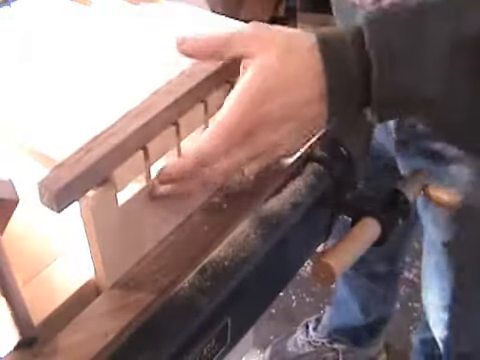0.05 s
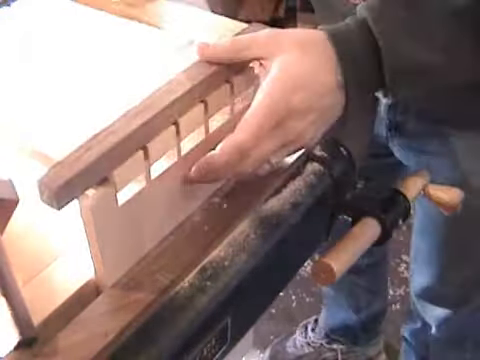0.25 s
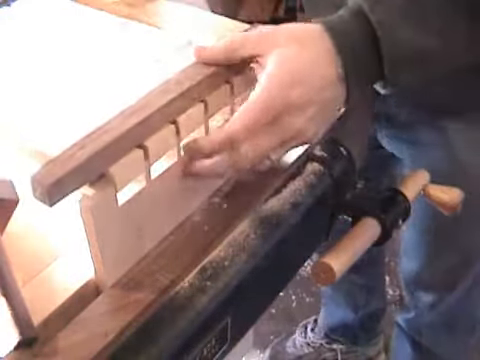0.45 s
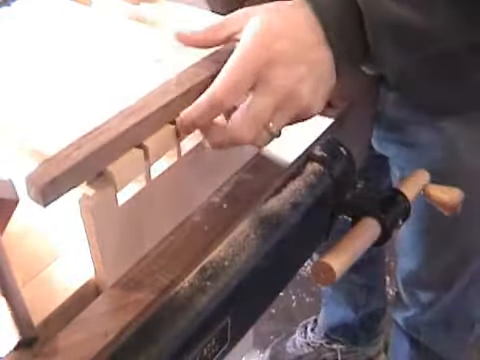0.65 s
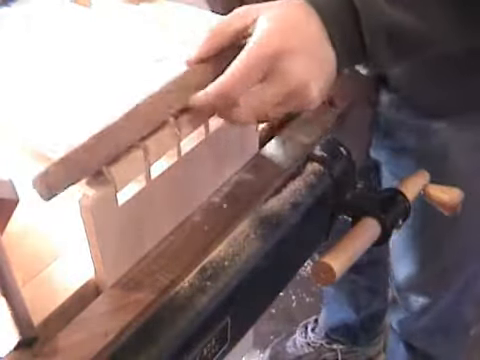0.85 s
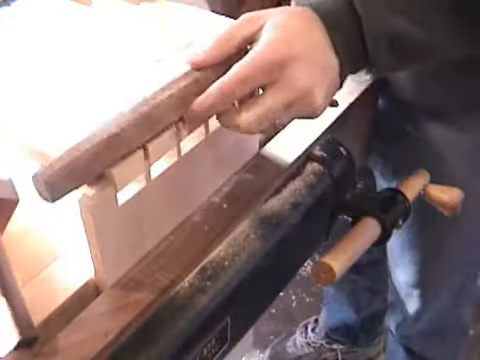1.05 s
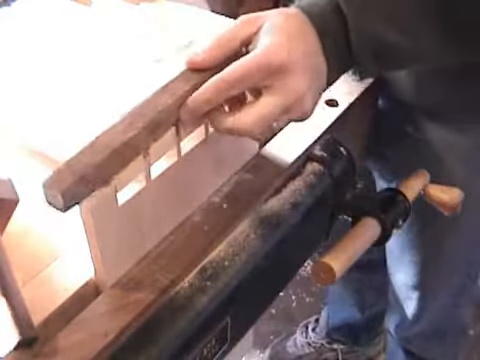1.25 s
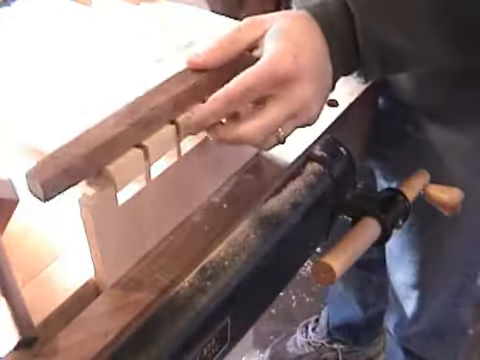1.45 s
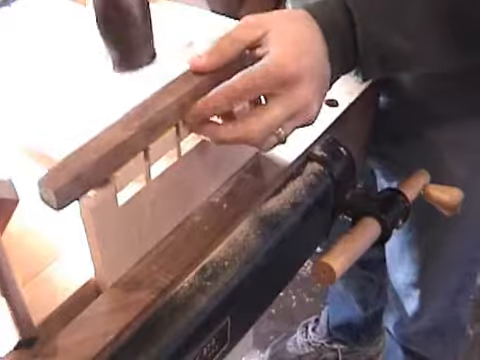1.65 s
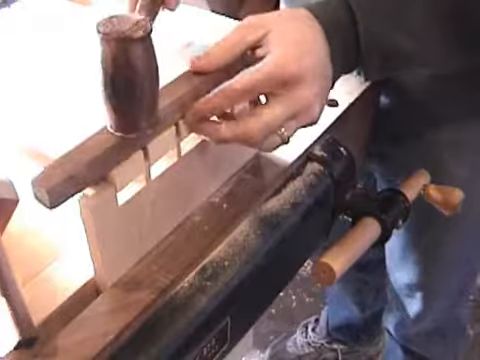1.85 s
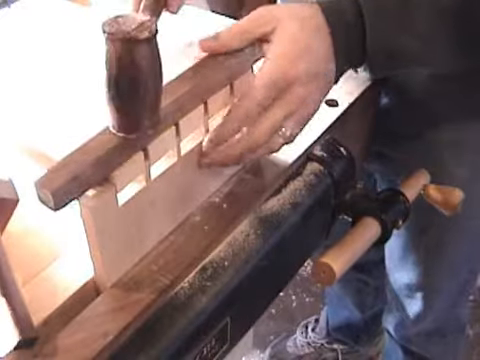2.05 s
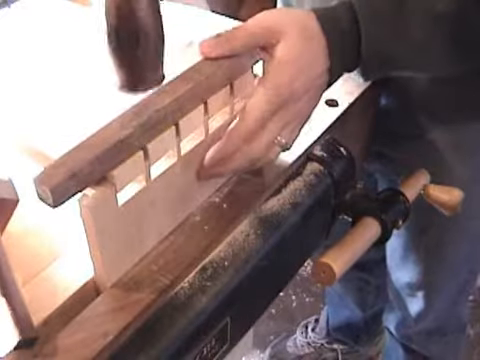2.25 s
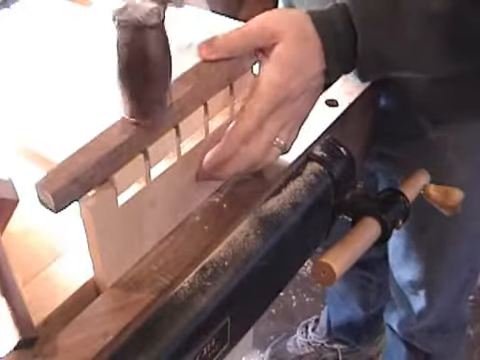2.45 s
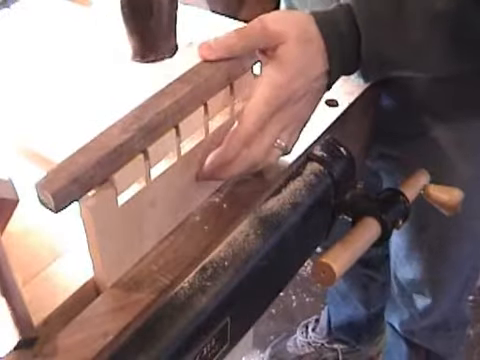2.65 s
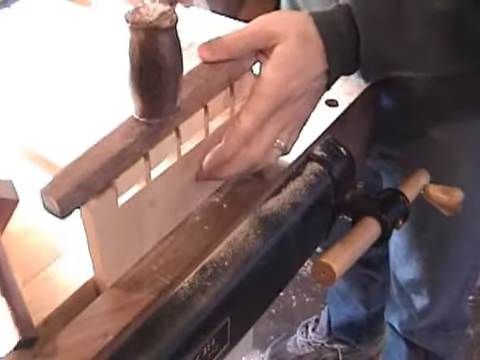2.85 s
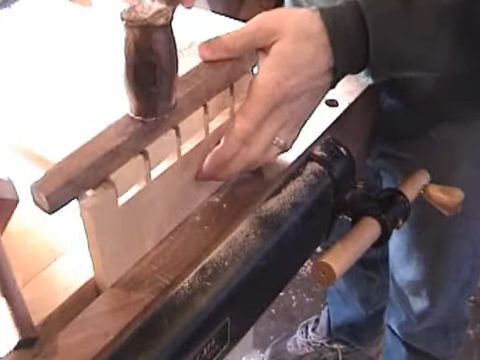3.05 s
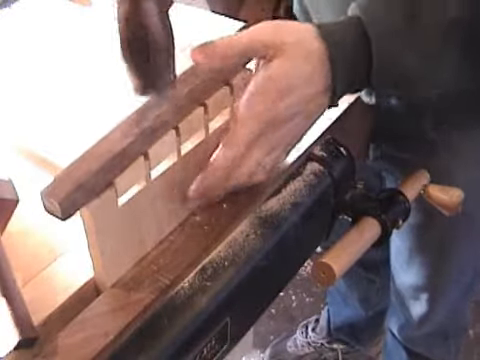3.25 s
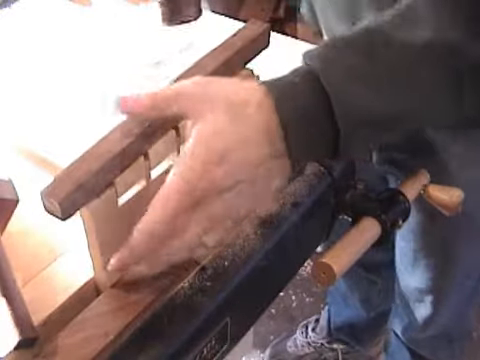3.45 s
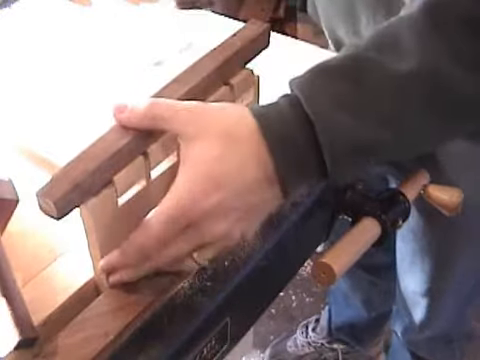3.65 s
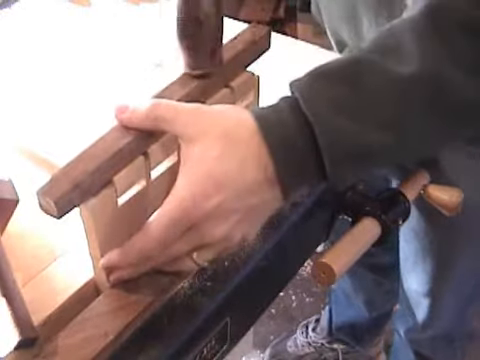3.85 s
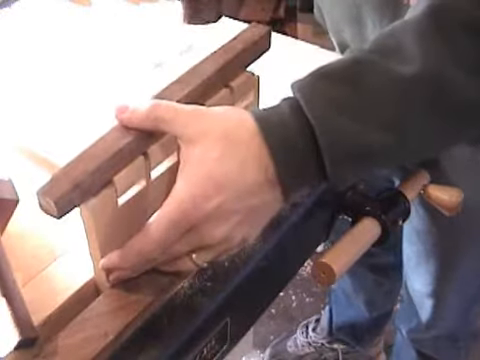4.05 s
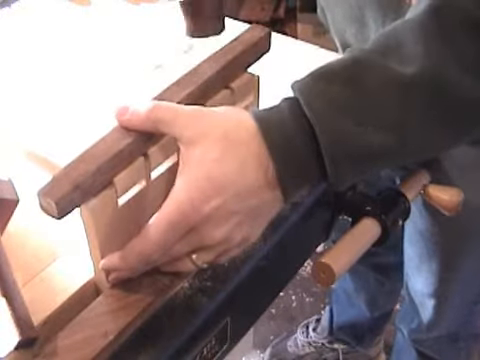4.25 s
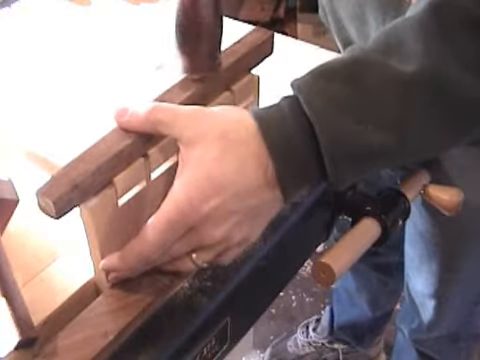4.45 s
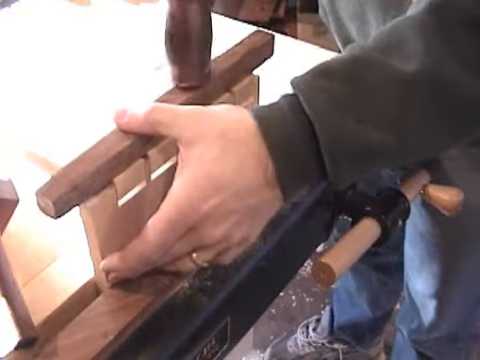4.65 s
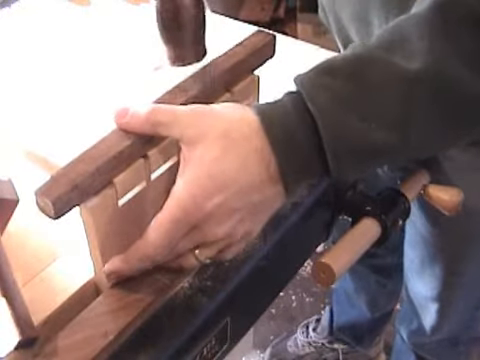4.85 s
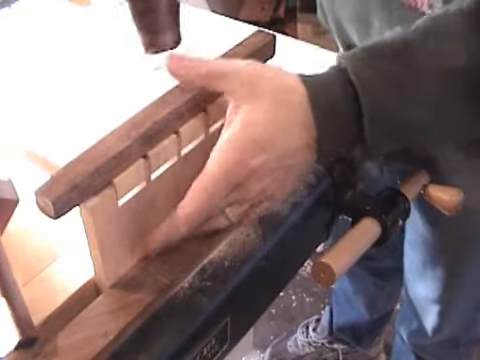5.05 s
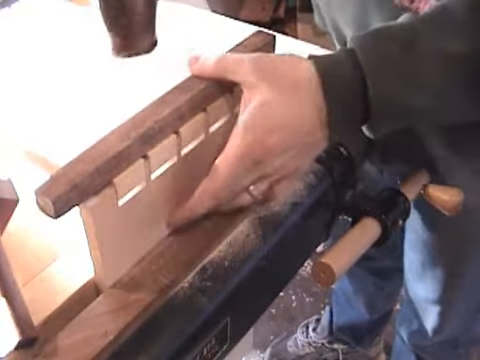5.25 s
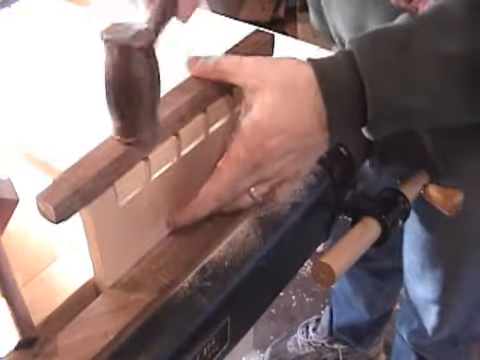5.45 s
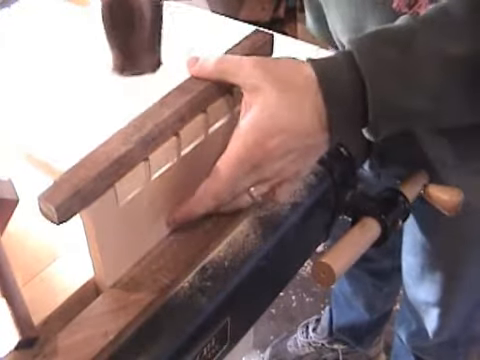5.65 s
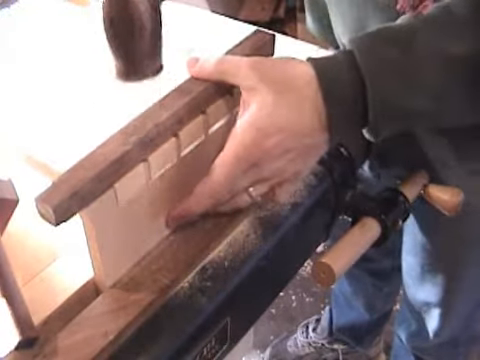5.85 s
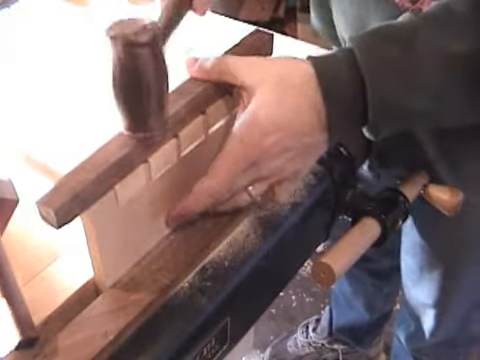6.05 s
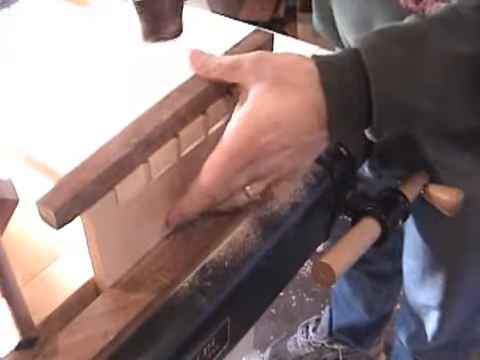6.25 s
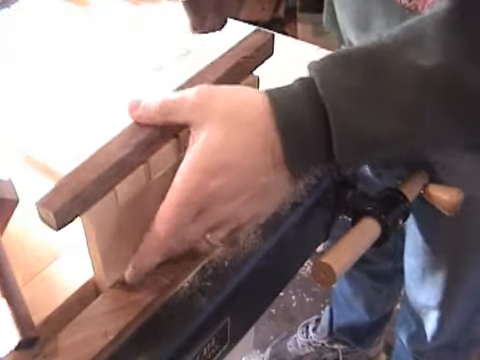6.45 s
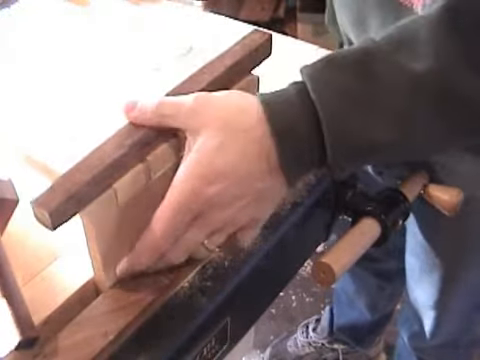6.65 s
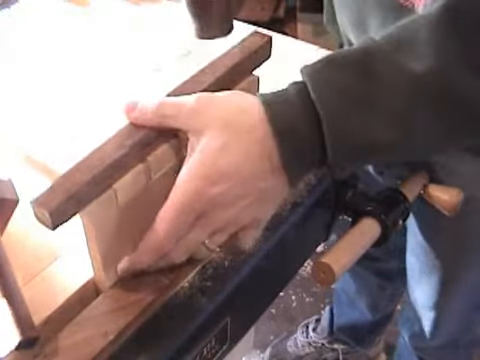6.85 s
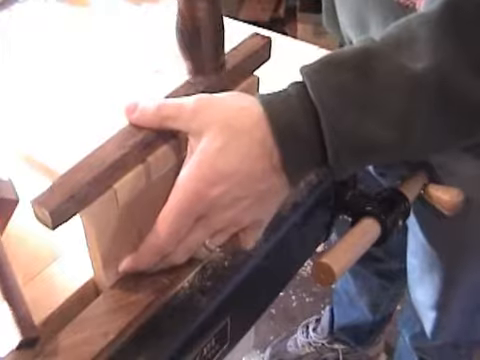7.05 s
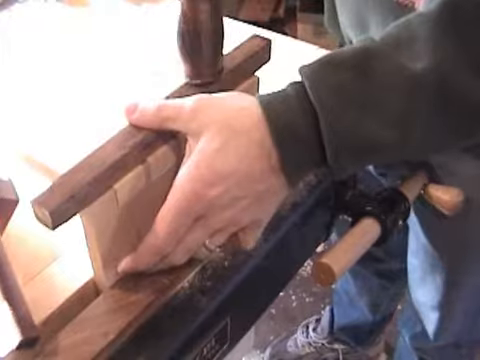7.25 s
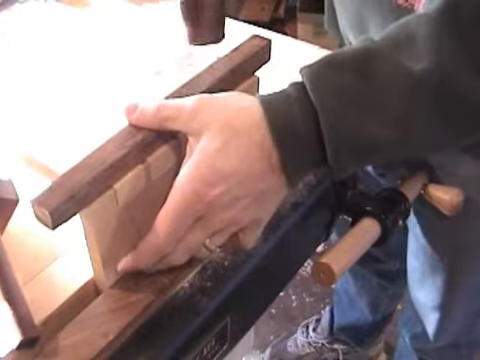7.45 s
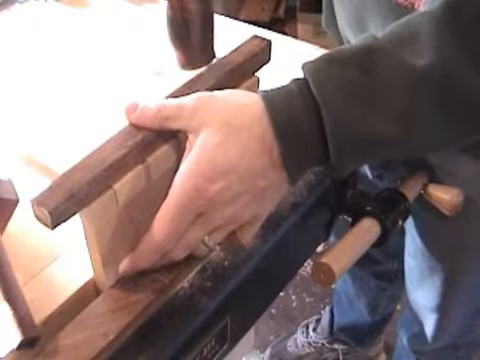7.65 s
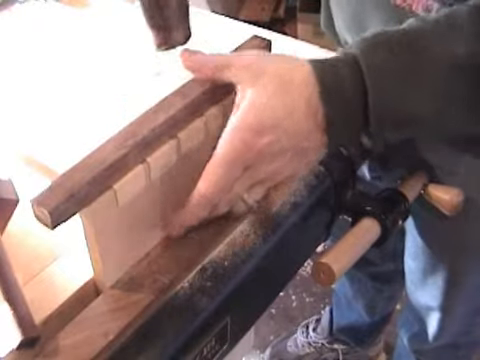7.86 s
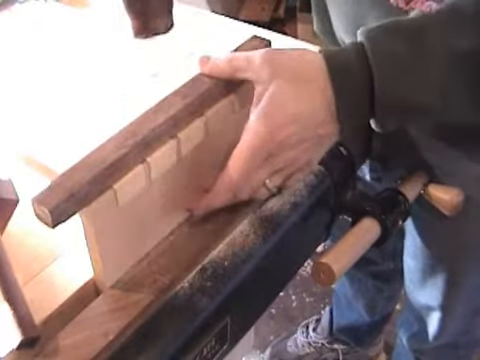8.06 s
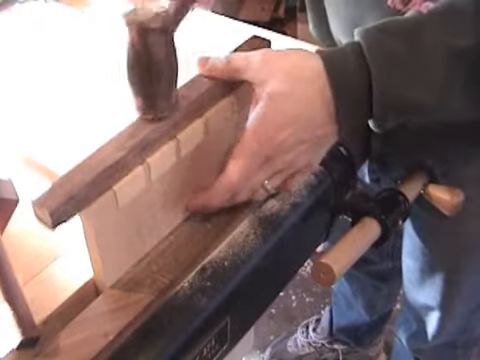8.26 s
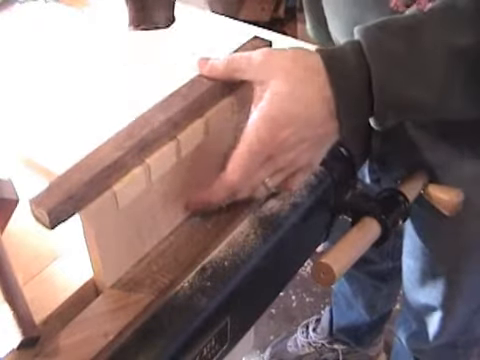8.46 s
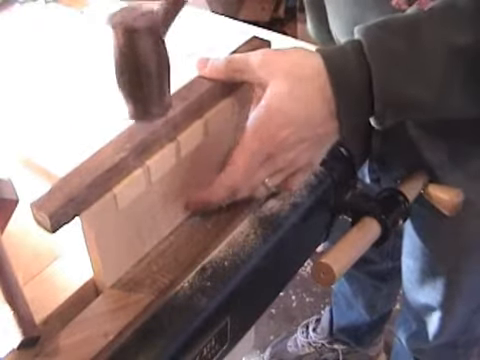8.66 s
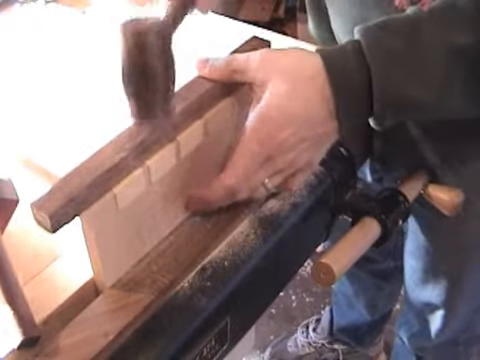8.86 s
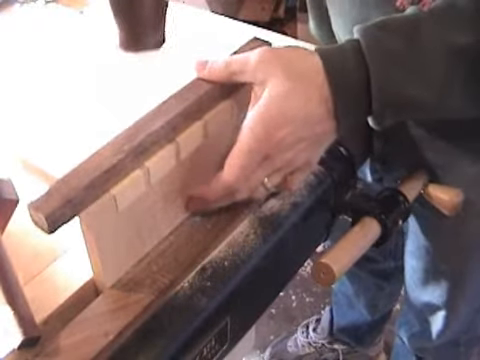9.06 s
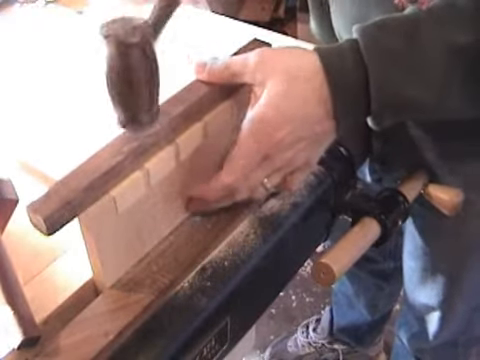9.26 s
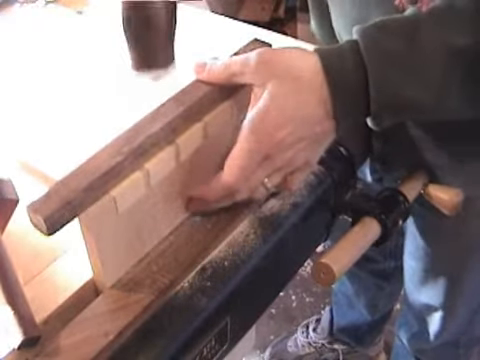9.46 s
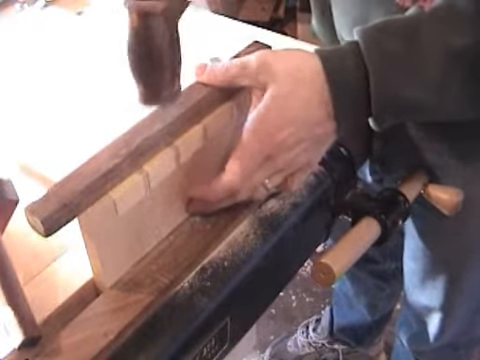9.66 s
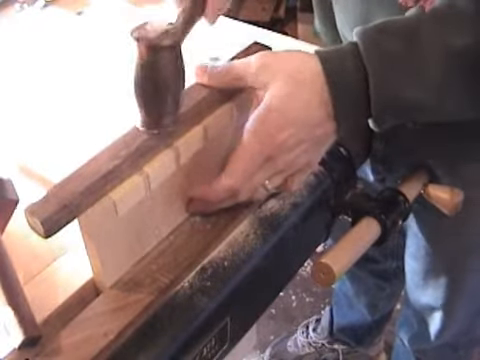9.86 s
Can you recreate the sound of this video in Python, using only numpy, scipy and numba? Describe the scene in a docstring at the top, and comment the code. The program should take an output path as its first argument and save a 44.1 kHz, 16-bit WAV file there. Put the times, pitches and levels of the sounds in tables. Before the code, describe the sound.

A wooden mallet raps a board joint in short runs of sharp, ringing knocks, echoing in a hard workshop over a low machinery rush.

```python
"""A wooden mallet knocks a dovetailed board home in a vice, heard close up in a hard-walled workshop.
Each blow is a chirped crack of filtered impulse plus decaying sines, the ringing modes of the boards.
The room returns it as a low flutter, a slap from the far wall and a dense tail of decaying noise.
Shaped noise makes the rush of distant machinery and an early hiss of fingers sliding on the wood.
A fast limiter and a slower gain control squeeze the loud blows."""
import sys
import numpy as np
from scipy import signal
from scipy.fft import rfft, irfft
from scipy.io import wavfile
from scipy.ndimage import uniform_filter1d
from numba import njit

SR = 44100
rng = np.random.default_rng(int(sys.argv[2]) if len(sys.argv) > 2 else 0)


def to_wav(s):
    """Save 16-bit WAV."""
    ch = np.atleast_2d(s).T  # columns
    pcm = np.round(np.clip(ch, -1, 1) * 32767)  # PCM
    wavfile.write(sys.argv[1], SR, pcm.astype(np.int16))


N = 436590


def undb(db):
    """Decibels to gain."""
    return 10 ** (np.asarray(db) / 20)


def colour(x, table):
    """Shape the spectrum by (Hz, dB) points, joined by straight lines over log frequency."""
    hz, db = np.transpose(table)
    f = np.fft.rfftfreq(x.shape[-1], 1 / SR) + 1
    gain = undb(np.interp(np.log(f), np.log(hz), db))
    return irfft(rfft(x) * gain, x.shape[-1])


def level(x, db):
    """Scale to an rms level."""
    return x * undb(db) / np.sqrt(np.mean(x ** 2))


def band(x, lo_hz, hi_hz):
    """Causal band-pass."""
    return signal.sosfilt(signal.butter(2, [lo_hz, hi_hz], "band", fs=SR, output="sos"), x)


def low_pass(x, hz):
    """Causal gentle low-pass."""
    return signal.sosfilt(signal.butter(2, hz, fs=SR, output="sos"), x)


def fade(t, t60):
    """Exponential decay, 60 dB down at t60 seconds."""
    return np.exp(-np.log(1000) * t / t60)


def walk(rate):
    """Random levels drawn rate times a second, then smoothed twice over one hold; spread below 1."""
    hold = int(SR / rate)
    steps = np.repeat(rng.standard_normal(N // hold + 1), hold)
    return uniform_filter1d(uniform_filter1d(steps, hold), hold)[:N]


@njit
def follow(x, attack, release):
    """Envelope follower with separate per-sample rates for rising and falling."""
    out, e = np.empty(len(x)), 0.
    for i in range(len(x)):
        e += (x[i] - e) * (attack if x[i] > e else release)
        out[i] = e
    return out


def shop():
    """Rush of far machines and air: shaped stereo noise whose lows flicker and whose rumble drifts."""
    # Spectrum of the rush. Each row: frequency in Hz, relative level in dB.
    rush_spectrum = [(12, -54), (20, -20.5), (108, -13), (169, -1.5), (215, -11.5), (281, -4), (313, -13.5),
                     (367, -8), (506, -7), (818, -9), (4390, -30), (9530, -46), (11800, -54), (15300, -95),
                     (22000, -120)]
    # Width of the rush. Each row: frequency in Hz, side minus mid in dB.
    rush_width = [(30, -9), (60, -10), (150, -11), (300, -10.5), (1500, -7), (3000, -5.5), (6000, -1),
                  (10000, 3)]
    # Slow drift of the deep rumble. Each row: time in seconds, change in dB.
    rumble_drift = [(0, -1.5), (5.5, -7.5), (7.5, 1), (9.9, -5)]
    mid, side = colour(rng.standard_normal((2, N)), rush_spectrum)
    rush = mid + colour(side, rush_width) * np.array([[1], [-1]])
    flicker = undb(3 * walk(9))
    drift = undb(np.interp(np.arange(N) / SR, *np.transpose(rumble_drift)))
    moving_lows = (flicker - 1) * low_pass(rush, 900)
    moving_rumble = (drift - 1) * low_pass(rush, 140)
    return level(rush + moving_lows + moving_rumble, -29.5)


def fingers():
    """Fingers sliding on the board: grainy hiss, lifted near 6 kHz, that swells, then stops short."""
    start_s, peak_s, peak_db = .16, .4, -34
    swell_db_per_s, fall_db_per_s = 70, 351
    t = np.arange(N) / SR
    swell_db = peak_db + np.minimum(swell_db_per_s * (t - peak_s), fall_db_per_s * (peak_s - t))
    grainy_noise = rng.standard_normal((2, N)) * undb(1.34 * walk(116))
    hiss = level(band(grainy_noise, 2500, 7300), 0) + level(band(grainy_noise, 5500, 6300), -15)
    return hiss * undb(swell_db) * (t > start_s)


def crack(length, tone):
    """The contact click, smeared into a falling chirp since high bending waves reach the air first."""
    # Spectrum of the click. Each row: frequency in Hz, relative level in dB.
    click_spectrum = [(200, -60), (800, -3), (1600, 4), (3000, 5), (4500, -2), (6500, -15), (9000, -23),
                      (12000, -40)]
    f = np.fft.rfftfreq(length, 1 / SR)
    spread_s, knee_hz = .005, 3400
    # lateness grows toward the lows and is held below 1200 Hz
    lateness = np.clip(np.sqrt(knee_hz / np.maximum(f, 1200)) - .75, 0, None)
    delay_s = spread_s * lateness + .0002
    # summing delay over frequency gives the phase of the chirp
    chirp = irfft(np.exp(-2j * np.pi * np.cumsum(delay_s) * f[1]), length)
    return colour(colour(chirp, click_spectrum), tone)


def knock(main_hz, bright_hz, thud_db, low_db, middle_db, upper_db, top_db):
    """One blow: a short crack and the decaying modes of the boards, some varied from blow to blow."""
    # Fixed modes of the boards. Each row: frequency in Hz, t60 in seconds, relative level in dB,
    # family whose strength each blow sets.
    board_modes = [(129.2, 0.13, -26, "thud"), (217.5, 0.095, -20, "thud"), (279.6, 0.067, -12.5, "thud"),
                   (340.8, 0.07, -12, "thud"), (517.8, 0.069, -7.5, "low"), (902, 0.019, -4.5, "middle"),
                   (1107, 0.015, -3.5, "middle"), (1325, 0.015, -4, "middle")]
    t = np.arange(8192) / SR
    family_db = dict(thud=thud_db, low=low_db, middle=middle_db)
    modes = [(f, t60, db + family_db[family]) for f, t60, db, family in board_modes]
    # these two rings move in pitch with the spot struck and the closing joint
    modes += [(main_hz, .028, 0), (bright_hz, .012, -4.5 + upper_db)]
    hz, t60, db = np.transpose(modes)[:, :, None]

    # only the middle modes scatter in level and pitch
    scatter_db, detune = 1.5, .025
    chance = rng.standard_normal((2, len(hz), 1)) * ((hz > 800) & (hz < 1500))
    phase = rng.uniform(0, 2 * np.pi, (len(hz), 1)) * (hz > 800)
    struck_hz = hz * (1 + detune * chance[1])
    strength = undb(db + scatter_db * chance[0])
    rings = strength * fade(t, t60) * np.sin(2 * np.pi * struck_hz * t + phase)
    # the boards take a few cycles to swing up
    rings = rings * (1 - np.exp(-t * hz / 1.93))

    tone = [(1300, middle_db), (2400, upper_db), (4800, top_db)]
    click = undb(18.5) * crack(len(t), tone) * (t < .05)
    return rings.sum(axis=0) + click


def boards():
    """Blows and bumps: force sets loudness; crispness, ring pitches and the closing joint set the tone."""
    # Mallet blows. Each row: start in seconds, force in dB, main ring in Hz, bright ring in Hz,
    # crispness in dB.
    blows = [(1.762, 3.5, 640, 2550, -5.5), (2.371, 19.5, 710, 2780, -0.5), (2.673, 24, 600, 3210, 1),
             (3.789, 35.5, 642, 1670, -2.5), (4.066, 23, 600, 1780, -1), (4.331, 37, 642, 2730, -0.5),
             (4.604, 34.5, 656, 2080, -1.6), (5.388, 31.5, 648, 2910, -2.5), (5.667, 24.5, 640, 2640, -0.5),
             (5.909, 22, 638, 2230, 5), (6.660, 29, 656, 2740, -6), (6.928, 29, 655, 2020, -5),
             (7.198, 35, 669, 2040, -6), (7.441, 27.5, 693, 2230, -7.5), (8.210, 31, 675, 2550, -4.5),
             (8.513, 19.5, 678, 1920, 2.5), (8.817, 26.5, 697, 1790, -2), (9.120, 25, 707, 2680, -2.5),
             (9.441, 27.5, 700, 2130, -4.5), (9.788, 25, 694, 2140, -3.5)]
    # Soft bumps of hand or mallet on the boards. Each row: start in seconds, force in dB, crispness in dB.
    bumps = [(.69, -20.5, -6.5), (1.047, -23, -9), (5.105, -15, -7), (6.41, -27, -2), (7.872, -14, -16)]
    # How each mode family follows a blow. Each entry: level in dB at crispness 0 and time 0,
    # dB per dB of crispness, dB per second as the joint closes.
    families = dict(thud=(-1.96, 0.69, -.2), low=(-2.65, 0.23, -0.04), middle=(2.03, 1.19, -0.58),
                upper=(0.33, 1.14, -.02), top=(-5.5, 1.43, 0.61))
    out = np.zeros(N + 8192)
    rows = blows + [(s, force_db, 640, 2700, crisp_db) for s, force_db, crisp_db in bumps]
    for s, force_db, main_hz, bright_hz, crisp_db in rows:
        start = int(s * SR)
        tone = [base + per_db * crisp_db + per_s * s for base, per_db, per_s in families.values()]
        out[start:start + 8192] += undb(force_db) * knock(main_hz, bright_hz, *tone)
    return out[:N]


def dense_tail(t):
    """Stereo reverberation: bands of noise that build up, each dying at its own rate."""
    # Bands of the tail. Each row: centre in Hz, t60 in seconds, relative level in dB, side minus mid in dB.
    tail_bands = [(90, 0.41, -8, -5), (187, 0.37, 4.5, -17.5), (365, 0.37, 2.5, -11), (683, 0.37, 1.5, -35),
                  (1406, 0.35, 4.5, -10), (2580, 0.33, -2, -9), (5900, 0.31, 7, -5.5),
                  (11100, 0.23, 14.5, 1)]
    out = np.zeros((2, len(t)))
    for hz, t60, db, width_db in tail_bands:
        mid, side = band(rng.standard_normal((2, len(t))), hz / np.sqrt(2), hz * np.sqrt(2))
        stereo = mid + undb(width_db) * side * np.array([[1], [-1]])
        out += undb(db - 26) * fade(t, t60) * stereo
    # the bench answers at once, the walls a few hundredths of a second later
    early_share, build_s = .48, .0648
    return out * (1 - (1 - early_share) * np.exp(-(t / build_s) ** 2))


def low_echoes(t):
    """A flutter between two facing walls, a bounce off the bench and one slap from the far wall."""
    flutter_first_s, flutter_s, flutter_count = .0215, .0226, 7
    # (delay in seconds, level in dB before the decay and the band-pass)
    bounces = [(flutter_first_s + k * flutter_s, .5) for k in range(flutter_count)]
    bounces += [(.013, 5.5), (.2005, 3.5)]  # bench, far wall
    side_db, t60 = -14, .52
    echoes = np.zeros((2, len(t)))
    for (delay_s, db), lean in zip(bounces, rng.standard_normal(len(bounces))):
        balance = 1 + undb(side_db) * lean * np.array([1, -1])
        echoes[:, int(delay_s * SR)] = undb(db) * fade(delay_s, t60) * balance
    return band(band(echoes, 423, 897), 423, 897)


def room():
    """Stereo impulse response: direct sound, low echoes and a dense tail."""
    t = np.arange(int(.8 * SR)) / SR
    out = dense_tail(t) + low_echoes(t)
    out[:, 0] += undb(-1.0)  # direct sound
    return out


def scene():
    """Boards through the room, over the workshop and the sliding fingers."""
    wood = signal.fftconvolve(boards()[None], room(), axes=1)[:, :N]
    return wood + shop() + fingers()


def record(dry):
    """A fast limiter and a slower gain control shared by both channels, soft clipping, then a top cut."""
    peak = np.abs(dry).max(axis=0)
    fast_top_db, attack_s, release_s, fast_ratio = -4, .0003, .04, 7
    slow_top_db, slow_s, slow_ratio = -27, .3, 1.15
    fast = follow(peak, 1 / (attack_s * SR), 1 / (release_s * SR))
    gain = np.minimum(undb(fast_top_db) / (fast + 1e-9), 1) ** (1 - 1 / fast_ratio)
    slow = follow(peak * gain, 1 / (slow_s * SR), 1 / (slow_s * SR))
    gain = gain * np.minimum(undb(slow_top_db) / (slow + 1e-9), 1) ** (1 - 1 / slow_ratio)

    ceiling = .84
    clipped = ceiling * np.tanh(dry * gain / ceiling)
    top_cut = signal.ellip(10, .2, 80, 11450, fs=SR, output="sos")  # steep, at 11450 Hz
    return signal.sosfilt(top_cut, band(clipped, 16, 10960))


dry = scene()
out = record(dry)
to_wav(out)
```